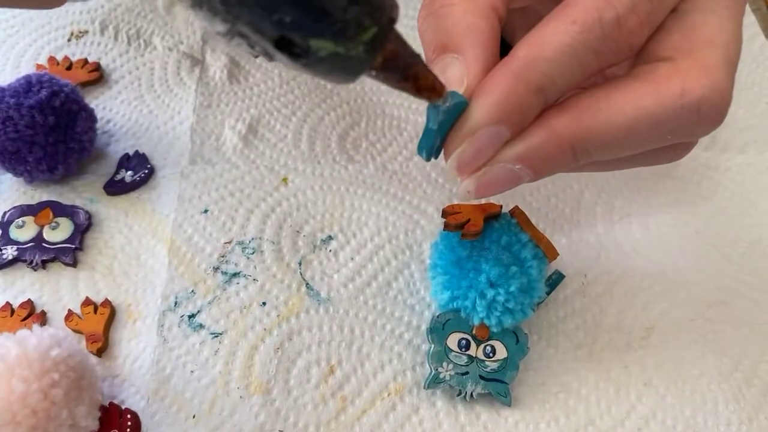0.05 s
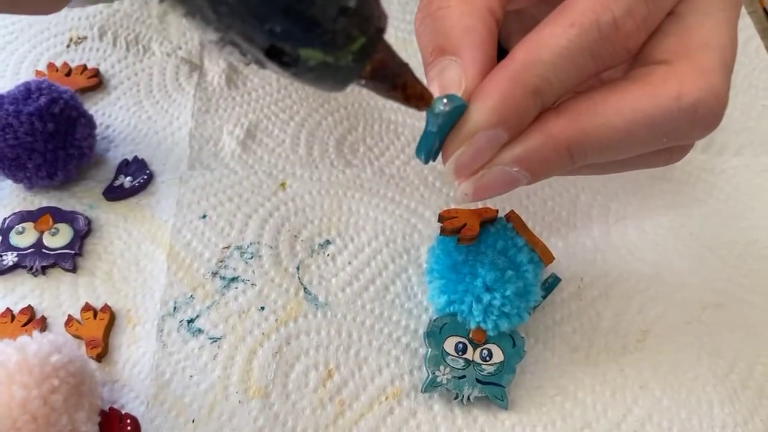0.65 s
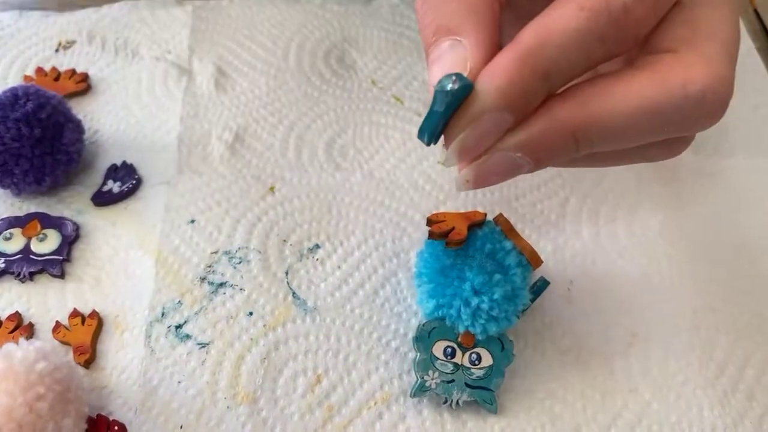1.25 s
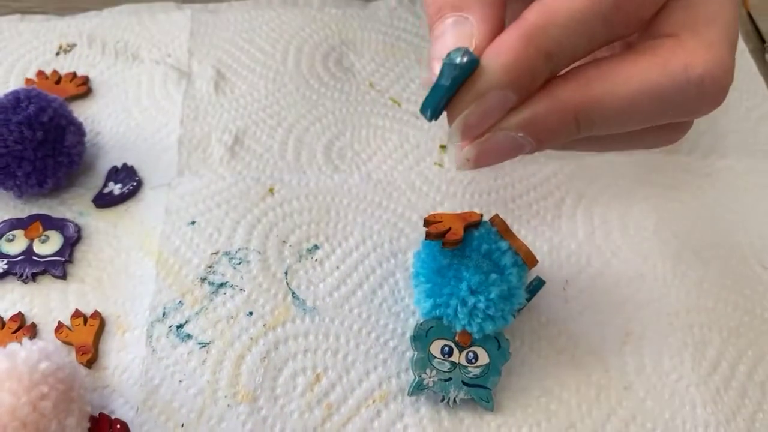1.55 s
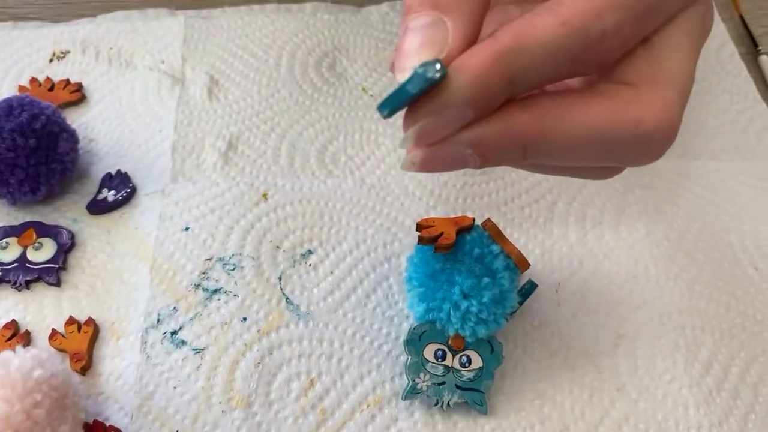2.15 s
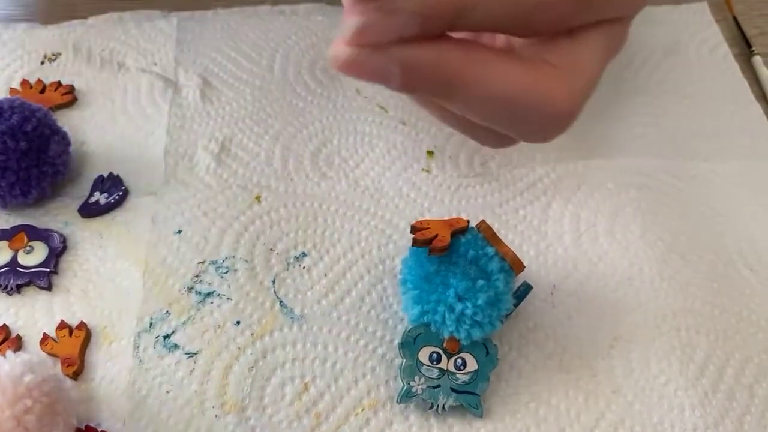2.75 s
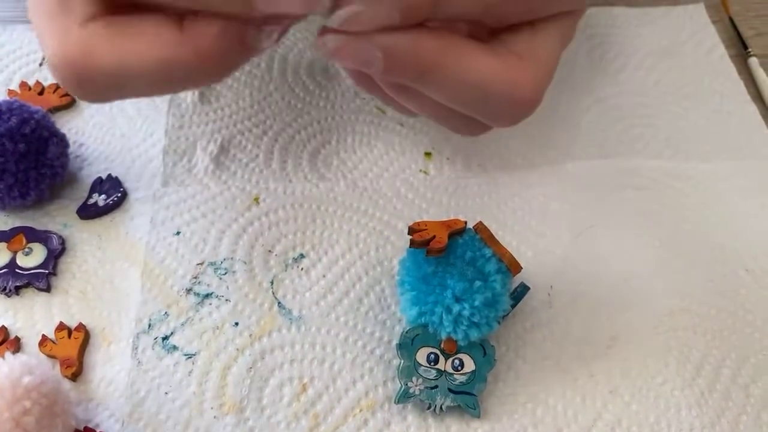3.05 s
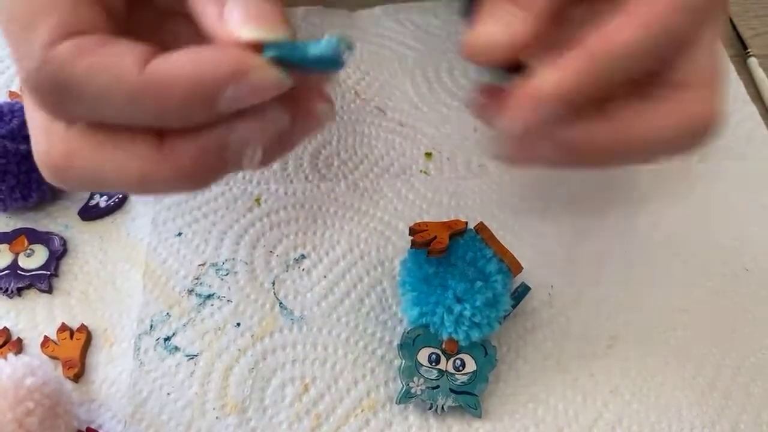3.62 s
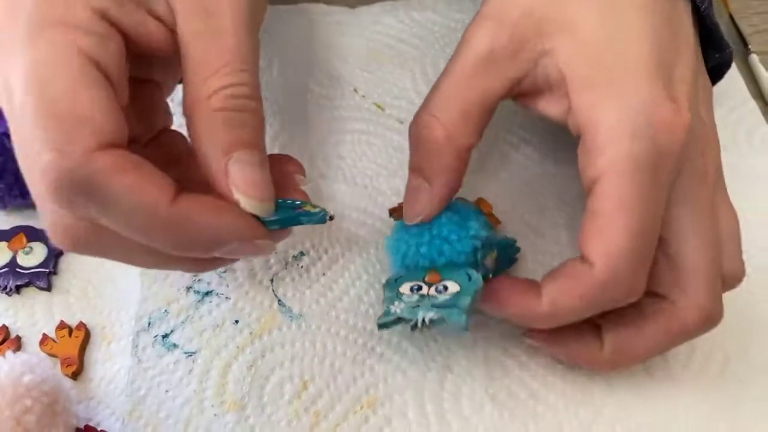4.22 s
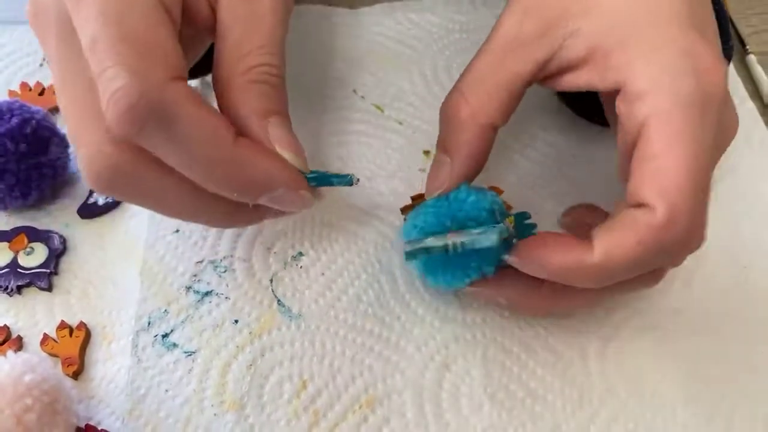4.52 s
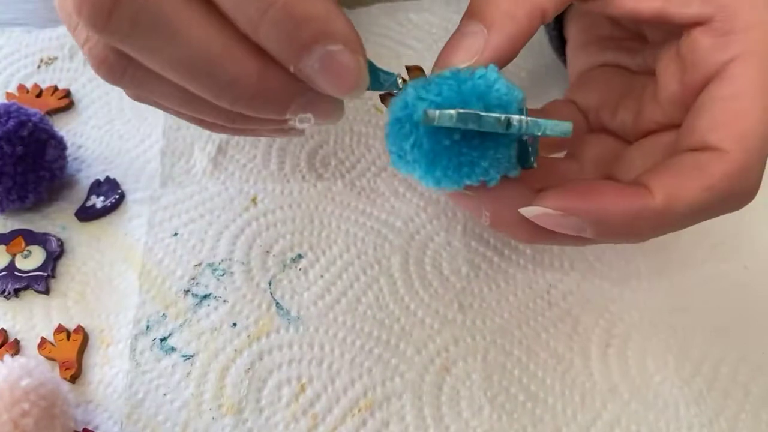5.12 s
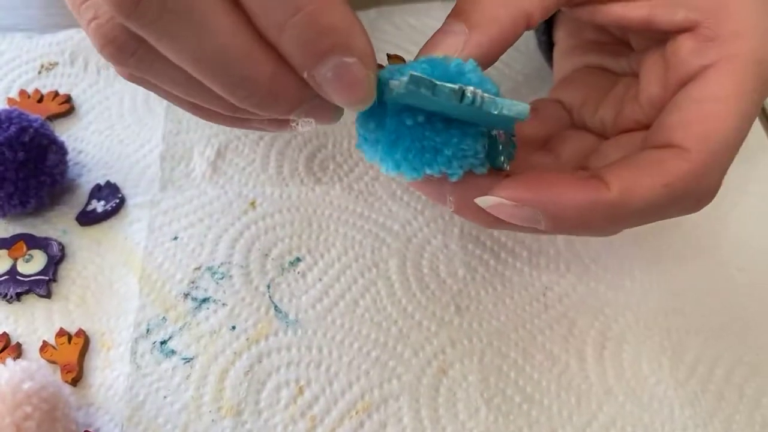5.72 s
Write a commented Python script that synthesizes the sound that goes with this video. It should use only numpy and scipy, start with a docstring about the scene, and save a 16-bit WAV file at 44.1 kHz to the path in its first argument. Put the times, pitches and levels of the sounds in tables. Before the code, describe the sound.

In a small quiet room, a hot glue gun's plastic trigger clicks and snaps back sharply. The gun bumps the table softly a few times, then lands with a double clack as it tips onto its wire stand. Afterwards, a hand brushes faintly over paper towel and fingernails tick lightly on small wooden craft pieces. The sounds are close, over a faint ventilation hum.

```python
"""A hot glue gun at a paper-covered craft table in a small quiet room. Its plastic trigger clicks and
snaps back, ringing the housing. The gun bumps the table, is set down and tips onto its wire stand:
shell, stand and table top ring. Fingernails tick on small wooden pieces, fingertips rub them, and a
hand brushes over the paper towel to pick up a pompom figure. Distant ventilation hums faintly."""
import sys
import numpy as np
from scipy import signal
from scipy.fft import rfft, irfft, next_fast_len
from scipy.io import wavfile

SR = 44100
rng = np.random.default_rng(int(sys.argv[2]) if len(sys.argv) > 2 else 0)


def file_out(sig):
    """Save sig as 16-bit WAV at sys.argv[1]."""
    # one column per channel
    cols = np.atleast_2d(sig).T
    # limit, then scale
    lim = np.clip(cols, -1, 1)
    pcm = np.round(lim * 32767).astype(np.int16)
    wavfile.write(sys.argv[1], SR, pcm)


N = 254513
TIME_S = np.arange(N) / SR

# Room air spectrum. Each row: frequency in Hz, relative level in dB.
AIR_SPECTRUM = [(15, -47), (25, -23), (74, -5), (170, -7), (190, -1.5), (249, -6), (285, -1), (309, -12.5),
                (344, -8), (416, -13), (887, -16), (1040, -16), (2160, -25.5), (5280, -29.5),
                (16000, -40.5)]
# Ventilation resonances. Each row: centre in Hz, width in Hz, level in dB.
VENT_BANDS = [(198, 65, -72.5), (284.8, 3.4, -73.5), (341, 12.6, -72), (1082.5, 7.5, -81.5)]

# Trigger and feed clicks. Each row: start in seconds, ring in dB, snap in dB, ring low-pass in Hz.
TRIGGER_CLICKS = [(0.043, -55.5, -67, 1800), (0.857, -41.5, -56, 2600), (0.87, -36, -48, 1970),
                  (0.9194, -16.5, -31.5, 2700)]
# Hard plastic snap. Each row: frequency in Hz, relative level in dB.
SNAP_SPECTRUM = [(400, -29), (1000, -10), (2200, 1), (3000, -4), (5500, 0), (7500, -11), (11000, -10),
                 (15000, -3)]
# Gun housing modes. Each row: frequency in Hz, level in dB, T60 in seconds.
HOUSING_MODES = [(576, -23, 0.027), (1044, -9, 0.035), (1590, -3, 0.01), (1775, -1, 0.011),
                 (1960, -7.5, 0.011), (3520, -19, 0.028), (4100, -5.5, 0.0082), (5570, -7, 0.0093),
                 (6500, -11.5, .006), (9900, -4, 0.012)]

# Short pings and hollow tocks, alone or sounding with knocks, clicks and ticks.
# Each row: start in seconds, level in dB, pitch in Hz.
PINGS_AND_TOCKS = [(0.058, -51, 1390), (0.1704, -53, 3750), (0.868, -36, 1540), (1.967, -48, 560),
                   (2.2080, -29, 5650), (4.058, -49, 1100), (4.2440, -46.5, 1390), (5.0570, -46, 550),
                   (5.5530, -50, 3080)]
# Nail catches. Each row: start in seconds, ring in dB, scuff in dB, pitch factor,
# scuff decay in seconds, band centre in Hz.
NAIL_TICKS = [(0.149, -70, -58, 1.01, 0.0016, 8500), (0.1706, -64, -44, 1.15, 0.0016, 7140),
              (1.0636, -59.5, -55.5, 0.78, 0.0037, 4500), (1.104, -65.5, -65, 1.1, .004, 6500),
              (1.268, -63.5, -62, 1.17, .0033, 4220), (1.942, -53, -48, 1.01, 0.0035, 4000),
              (1.965, -58, -59, 1.1, .0044, 6500), (2.167, -39.5, -57, 1.13, .002, 11100),
              (3.235, -62.5, -70, 1.1, 0.026, 3970), (4.667, -57, -57, 1.06, 0.01, 2100),
              (4.878, -53, -53.5, 0.97, 0.0098, 5000), (5.5525, -57, -55, 0.64, 0.0075, 1100)]
# Wooden piece modes. Each row: frequency in Hz, level in dB, T60 in seconds, at pitch factor 1.
PIECE_MODES = [(1843, 1, 0.037), (2336, -8.5, 0.19), (3040, -3.5, 0.044), (3800, -6.5, 0.037),
               (4350, -6.5, 0.04), (5580, -4.5, 0.031), (7380, -7.5, 0.016), (9600, -17, 0.0083),
               (13100, -9, 0.0047)]
# Fingertip rubs. Each row: peak time in seconds, rise and fall in seconds, level in dB,
# centre in Hz, width in Hz.
FINGER_RUBS = [(0.241, .014, -69.5, 2140, 1400), (1.246, 0.011, -69.5, 2280, 1800),
               (1.617, 0.025, -66.5, 2600, 4000), (2.595, 0.049, -78, 4530, 500),
               (2.83, 0.1, -81.5, 8900, 9100), (5.242, 0.0086, -70, 2110, 1600)]

# Gun blows on the table. Each row: start in seconds; shell, stand, thump, crack and sway in dB;
# low-pass in Hz; second edge's lag in seconds and its relative level in dB.
GUN_BLOWS = [(1.0301, -47.5, -40, -44.5, -52, -49.5, 1360, .0114, -12),
             (1.5570, -56, -60, -42.5, -49, -43.5, 1470, .016, -4),
             (1.628, -53.5, -53, -50.5, -46, -56, 3180, .0174, -29),
             (1.967, -47.5, -61, -44, -55, -43, 494, .006, 2),
             (2.1156, -26, -35.5, -28, -23.5, -29.5, 5570, .0058, -0.5),
             (2.2087, -34.5, -26, -31.5, -31, -27, 2680, .0052, -16.5)]
# Modes of gun shell, wire stand, table thump and table sway.
# Each row: frequency in Hz, level in dB, T60 in seconds.
GUN_SHELL_MODES = [(616, -5.5, 0.093), (752.5, -5.5, 0.12), (890, -3, 0.018), (1040, -14, 0.17),
                   (1200, -1.5, 0.02), (1357, -8, 0.05), (1650, -6.5, 0.034), (1875, -0.5, 0.046),
                   (2102, -6.5, 0.023), (2260, -6.5, 0.024), (2850, -38.5, 0.013), (3200, -20.5, 0.032),
                   (3370, -12, 0.013), (5000, -8, 0.0099), (5240, -4, 0.027), (7500, -13, 0.027)]
WIRE_STAND_MODES = [(420, -6, 0.041), (1084, -11.5, 0.058), (1148, -9.5, 0.067), (1295, -9, 0.092),
                    (1534.7, -15.5, 0.34), (1630, -14, 0.24), (1790, -6.5, 0.0284), (2060, -3.5, 0.04),
                    (2430, -8.5, 0.03)]
TABLE_THUMP_MODES = [(166, -11.5, .09), (206, -5.5, 0.062), (244.4, -6, 0.15), (278.4, -5, 0.061),
                     (350, -6.5, 0.055), (388, -7.5, 0.068), (455, -9.5, 0.026), (550, -12.5, 0.072)]
TABLE_SWAY_MODES = [(57, -10, 0.35), (78, -2.5, 0.17), (103, 0.5, 0.21)]
# Dense, fast-dying contact modes. Each row: frequency in Hz, relative level in dB.
CRACK_SPECTRUM = [(200, -32), (500, -4.5), (1200, 10.5), (2200, 6.5), (3100, 2), (5500, -3), (6800, -5),
                  (9000, -6.5), (15000, 0)]
# Leaning arms nudge the table. Each row: start in seconds, level in dB.
ARM_NUDGES = [(1.594, -46), (2.94, -57), (3.17, -55)]

# Hand strokes. Each row: peak time in seconds, level in dB, rise in seconds, fall in seconds,
# relative sizzle in dB.
HAND_STROKES = [(3.72, -71, 0.03, 0.14, -10), (3.97, -64.5, 0.069, 0.12, -5), (4.305, -62.5, 0.058, .04, 4),
                (4.46, -68, 0.058, 0.056, -7)]
# Paper friction spectrum. Each row: frequency in Hz, relative level in dB.
PAPER_SPECTRUM = [(600, -6), (1100, -3), (1600, -0.5), (2250, 5.5), (3000, -10), (4500, -10), (5800, -8.5),
                  (7500, -4.5), (9200, -9.5), (11000, -17.5), (13000, -14), (15000, -8.5)]

# Room decay. Each row: frequency in Hz, T60 in seconds.
REVERB_T60 = [(100, 1.5), (300, 0.5), (1500, 0.92), (5000, 0.2), (14000, 0.86)]
# Reflection spectrum. Each row: frequency in Hz, gain in dB.
REVERB_SPECTRUM = [(60, -19), (250, -11.5), (700, -15), (1600, -18.5), (5000, -15), (9000, -20),
                   (15000, -19)]


def from_db(db):
    """Decibels to gain."""
    return 10 ** (np.asarray(db) / 20)


def unit_rms(x):
    """Scale to rms 1."""
    return x / np.sqrt(np.mean(x ** 2) + 1e-20)


def at_hz(points, hz):
    """Interpolate a table over log frequency."""
    points_hz, values = np.transpose(points)
    return np.interp(np.log(np.maximum(hz, 1)), np.log(points_hz), values)


def butter(x, hz, kind="low", order=2):
    """Butterworth filter, low-pass by default."""
    sos = signal.butter(order, np.clip(hz, 10, .45 * SR), kind, fs=SR, output="sos")
    return signal.sosfilt(sos, x)


def shaped_noise(spectrum, size=N):
    """Noise of a given spectrum, rms 1."""
    fft_size = next_fast_len(size)
    gain = from_db(at_hz(spectrum, np.arange(fft_size // 2 + 1) * SR / fft_size))
    bins = rfft(rng.standard_normal(fft_size)) * gain
    return unit_rms(irfft(bins, fft_size)[:size])


def band_noise(hz, width_hz):
    """Noise through one resonance, rms 1."""
    edges_hz = [hz - width_hz / 2, hz + width_hz / 2]
    return unit_rms(butter(rng.standard_normal(N), edges_hz, "band", order=1))


def ring(modes, t, scatter_db):
    """Decaying sines of alternating sign; mode levels vary per blow."""
    hz, db, t60_s = np.transpose(modes)[:, :, None]
    signs = (-1) ** np.arange(len(db))[:, None]
    gains = signs * from_db(db + scatter_db * rng.standard_normal(db.shape))
    return np.sum(gains * from_db(-60 * t / t60_s) * np.sin(2 * np.pi * hz * t), axis=0)


def swell(peak_s, rise_s, fall_s):
    """Gaussian rise and fall, peak 1."""
    sigma_s = np.where(TIME_S < peak_s, rise_s, fall_s)
    return np.exp(-.5 * ((TIME_S - peak_s) / sigma_s) ** 2)


def add(track, start_s, sound):
    """Mix a sound in at start_s."""
    start = round(start_s * SR)
    track[start:start + len(sound)] += sound[:N - start]


def room_tone(air_db=-64.08):
    """Steady air noise and the wavering hum of distant ventilation."""
    air = from_db(air_db) * shaped_noise(AIR_SPECTRUM)
    return air + sum(from_db(db) * band_noise(hz, width_hz) for hz, width_hz, db in VENT_BANDS)


def trigger(snap_decay_s=0.0028, snap_cutoff_ratio=3.5, housing_lag_s=.0011, highpass_hz=450):
    """The plastic trigger snaps and rings a housing too small to radiate bass."""
    out, t = np.zeros(N), TIME_S[:SR // 8]
    for start_s, ring_db, snap_db, lowpass_hz in TRIGGER_CLICKS:
        snap = from_db(snap_db) * shaped_noise(SNAP_SPECTRUM, len(t)) * np.exp(-t / snap_decay_s)
        housing = from_db(ring_db) * ring(HOUSING_MODES, t, scatter_db=4.5)
        add(out, start_s, butter(snap, snap_cutoff_ratio * lowpass_hz, order=1))
        add(out, start_s + housing_lag_s, butter(housing, lowpass_hz))
    return butter(out, highpass_hz, "high")


def tocks(t60_at_1khz_s=0.017, damping_exponent=0.43):
    """Short single-pitch pings and hollow tocks; higher ones die sooner."""
    out, t = np.zeros(N), TIME_S[:SR // 8]
    for start_s, db, hz in PINGS_AND_TOCKS:
        t60_s = t60_at_1khz_s * (1000 / hz) ** damping_exponent
        attack = 1 - np.exp(-2 * hz * t)
        add(out, start_s, ring([(hz, db, t60_s)], t, scatter_db=3.5) * attack)
    return out


def nail_ticks():
    """A nail catches on thin wood: a brief scuff and a tiny ring, higher in smaller pieces."""
    out, t = np.zeros(N), TIME_S[:SR // 6]
    for start_s, ring_db, scuff_db, pitch, decay_s, centre_hz in NAIL_TICKS:
        scuff = from_db(scuff_db) * rng.standard_normal(len(t)) * np.exp(-t / decay_s)
        wood = from_db(ring_db) * ring(PIECE_MODES, pitch * t, scatter_db=-1.5)
        tick = butter(wood + scuff, centre_hz / 1.9, "high")
        add(out, start_s, butter(tick, centre_hz * 1.93, order=1))
    return out


def finger_rubs():
    """Skin friction on a piece: faint swells of band noise."""
    return sum(from_db(db) * band_noise(hz, width_hz) * swell(peak_s, slope_s, slope_s)
               for peak_s, slope_s, db, hz, width_hz in FINGER_RUBS)


def table_contact(stand_db, thump_db, crack_db, t, crack_decay_s=0.01):
    """One touch of the gun rings the stand, thumps the table and cracks."""
    stand = from_db(stand_db) * ring(WIRE_STAND_MODES, t, scatter_db=1.5)
    thump = from_db(thump_db) * ring(TABLE_THUMP_MODES, t, scatter_db=5.5)
    crack = from_db(crack_db) * shaped_noise(CRACK_SPECTRUM, len(t)) * np.exp(-t / crack_decay_s)
    return stand + thump + crack


def table_sway(db, t, rise_s=0.0021):
    """The table top gives way in its lowest modes, with a soft attack."""
    return from_db(db) * ring(TABLE_SWAY_MODES, t, scatter_db=1.0) * (1 - np.exp(-t / rise_s))


def gun_knocks(chatters=3, chatter_gap_s=.023, loss_db=5, chatter_lowpass_hz=1860, sway_lag_s=0.0034):
    """The gun lands on two edges in turn, ringing its shell; the stand chatters, the table sways."""
    out, t = np.zeros(N), TIME_S[:SR // 2]
    for (start_s, shell_db, stand_db, thump_db, crack_db, sway_db,
         lowpass_hz, second_lag_s, second_db) in GUN_BLOWS:
        for lag_s, edge_db in ((0, 0), (second_lag_s, second_db)):
            shell = from_db(shell_db) * ring(GUN_SHELL_MODES, t, scatter_db=4.0)
            blow = shell + table_contact(stand_db, thump_db, crack_db, t)
            add(out, start_s + lag_s, from_db(edge_db) * butter(blow, lowpass_hz, order=1))
        for k in range(chatters):
            touch = table_contact(stand_db - 15, thump_db - 5.5, crack_db - 6, t)
            chatter = from_db(-k * loss_db) * butter(touch, chatter_lowpass_hz, order=1)
            add(out, start_s + (k + 1) * chatter_gap_s, chatter)
        add(out, start_s + sway_lag_s, table_sway(sway_db, t))
    return out


def arm_nudges():
    """Leaning arms set the table top swaying."""
    out = np.zeros(N)
    for start_s, db in ARM_NUDGES:
        add(out, start_s, table_sway(db, TIME_S[:SR // 2]))
    return out


def paper_brush(grain_db=2.0, grain_hz=90, sizzle_hz=12800):
    """Friction hiss swells with each hand stroke, grainy from the embossing; quick strokes sizzle."""
    grain = from_db(grain_db * unit_rms(butter(rng.standard_normal(N), grain_hz)))
    hiss = shaped_noise(PAPER_SPECTRUM)
    sizzle = butter(shaped_noise(PAPER_SPECTRUM), sizzle_hz, "high", order=4)
    return grain * sum(from_db(db) * swell(peak_s, rise_s, fall_s) * (hiss + from_db(sizzle_db) * sizzle)
                       for peak_s, db, rise_s, fall_s, sizzle_db in HAND_STROKES)


def reverb(x, build_s=0.0012, early_db=11, early_s=0.022):
    """Strong early reflections off table and near walls, then a diffuse tail decaying band by band."""
    t, response = TIME_S[:SR * 3 // 4], 0
    edges_hz = np.geomspace(40, 18000, 10)
    early = (1 + from_db(early_db) * np.exp(-t / early_s)) * (1 - np.exp(-t / build_s))
    for low_hz, high_hz in zip(edges_hz, edges_hz[1:]):
        hz = np.sqrt(low_hz * high_hz)
        decay = from_db(-60 * t / at_hz(REVERB_T60, hz))
        tail = rng.standard_normal(len(t)) * early * decay / np.sqrt(np.sum(decay ** 2))
        response += from_db(at_hz(REVERB_SPECTRUM, hz)) * butter(tail, [low_hz, high_hz], "band")
    return signal.fftconvolve(x, response)[:N]


def scene():
    """Gun, small taps and table with reflections and room tone, mono."""
    gun = trigger()
    taps = nail_ticks() + tocks()
    table = gun_knocks() + arm_nudges() + paper_brush() + finger_rubs()
    # the table's low sway stays dry; only its higher sounds go to the reverb
    send = butter(table, 170, "high") + from_db(0.5) * gun + from_db(1.0) * taps
    return (gun + taps + table + reverb(send) + room_tone())[None]


def record(dry, highpass_hz=40, soften_hz=15500, cutoff_hz=15750):
    """Shed deep bass, soften the top, then cut it steeply."""
    soft = butter(butter(dry, highpass_hz, "high"), soften_hz)
    return signal.sosfilt(signal.ellip(10, .1, 70, cutoff_hz, fs=SR, output="sos"), soft)


dry = scene()
out = record(dry)
file_out(out)
```